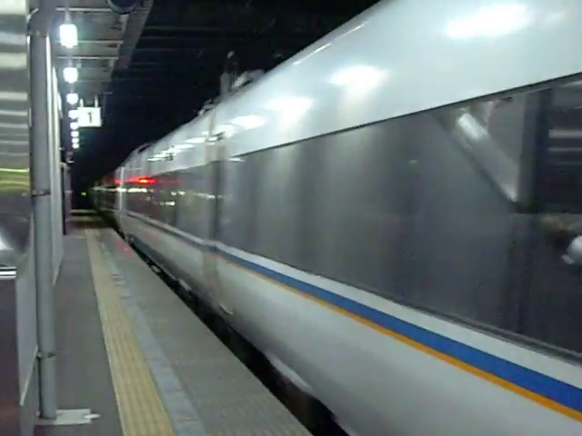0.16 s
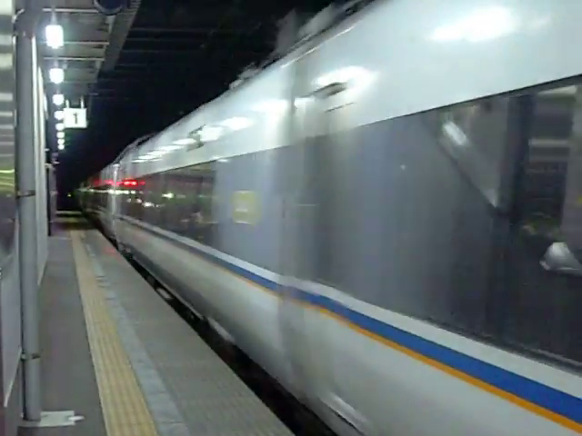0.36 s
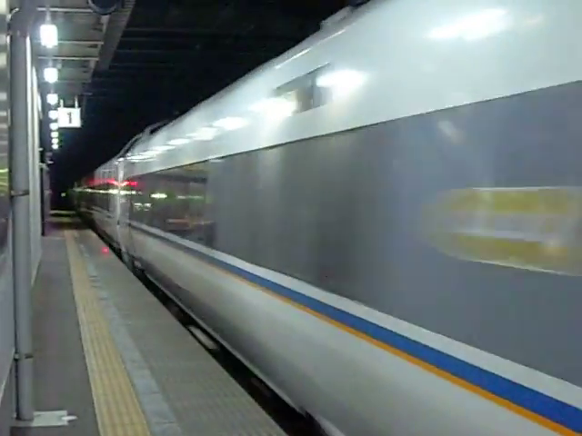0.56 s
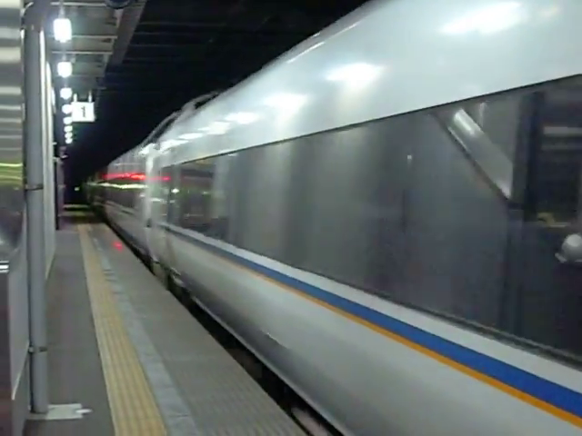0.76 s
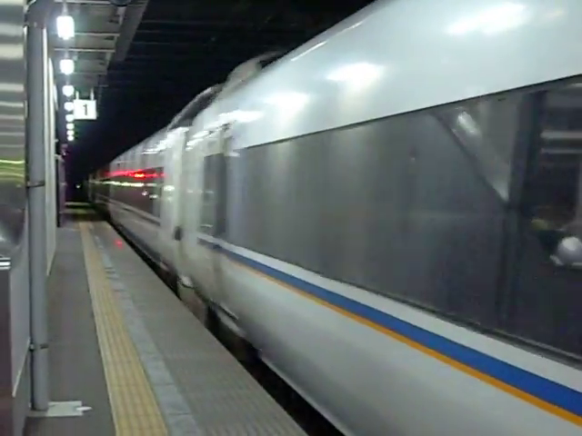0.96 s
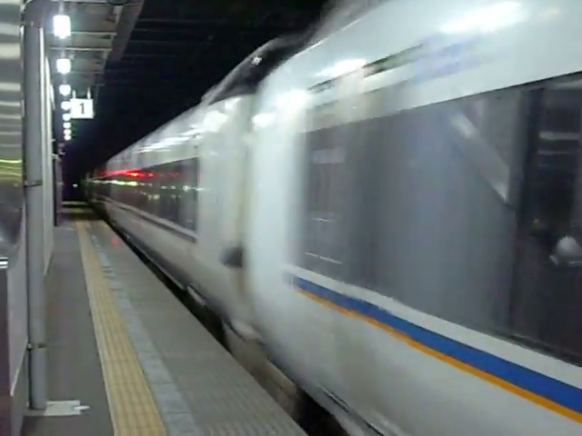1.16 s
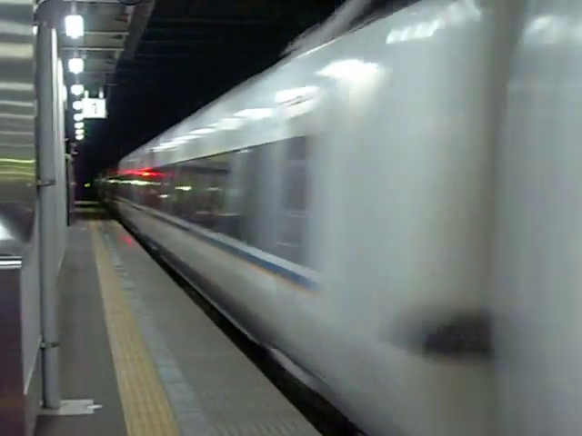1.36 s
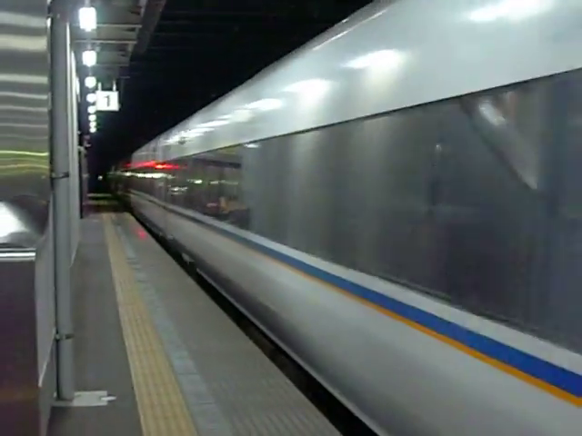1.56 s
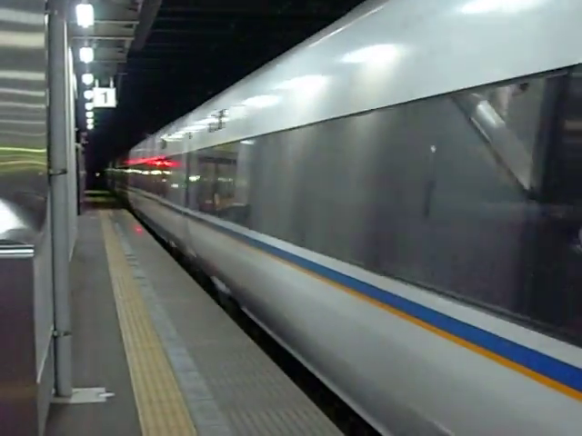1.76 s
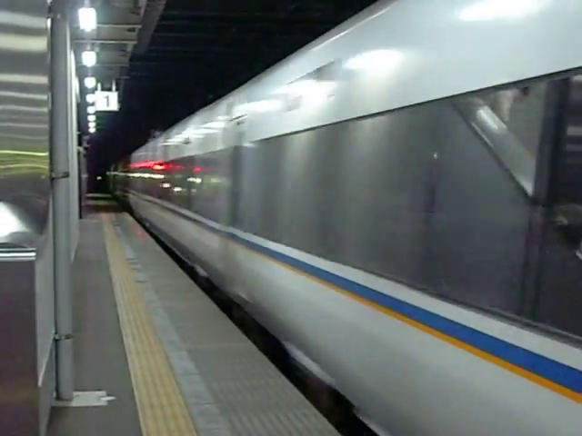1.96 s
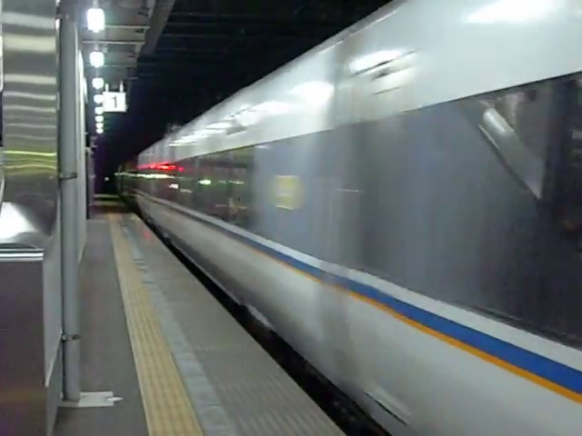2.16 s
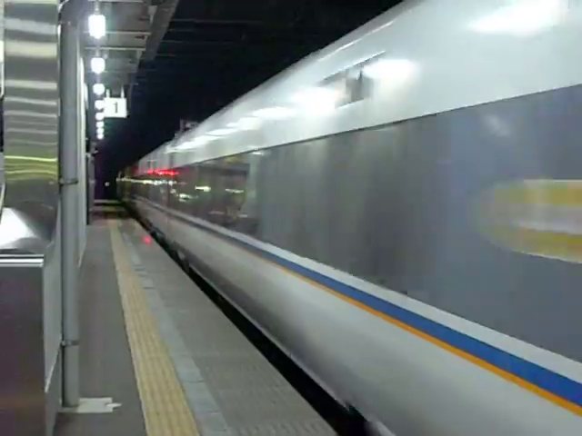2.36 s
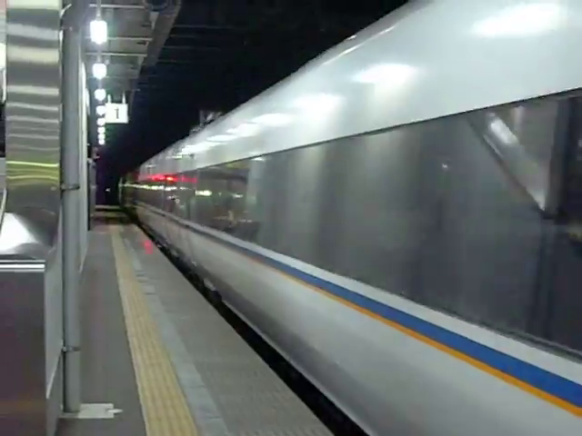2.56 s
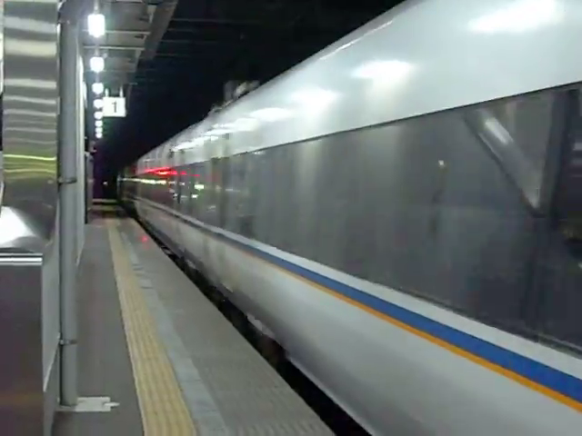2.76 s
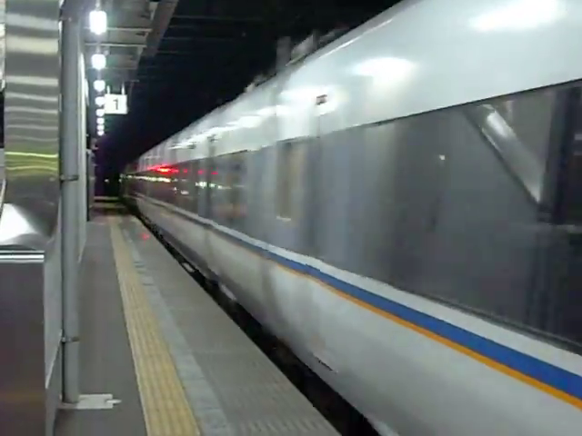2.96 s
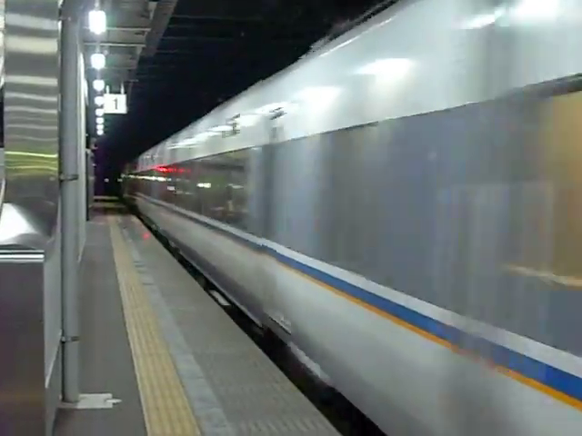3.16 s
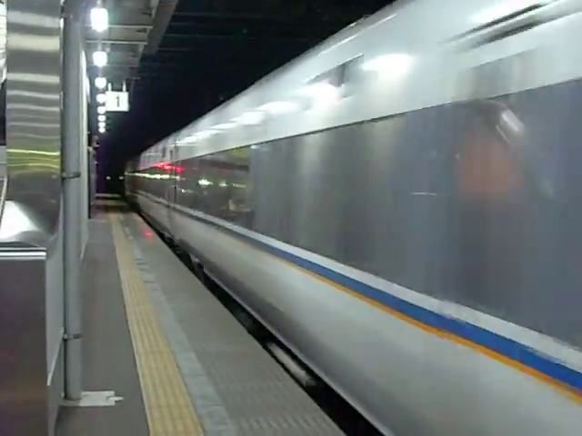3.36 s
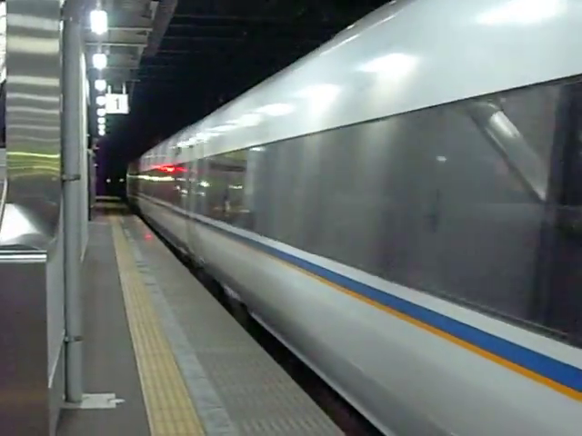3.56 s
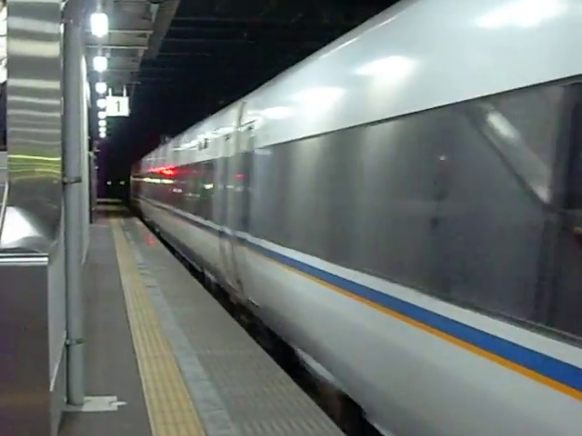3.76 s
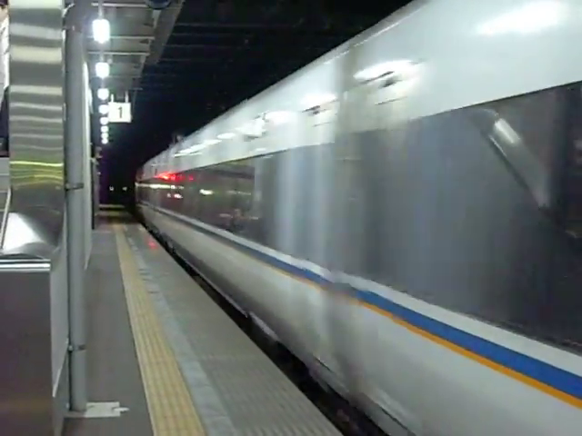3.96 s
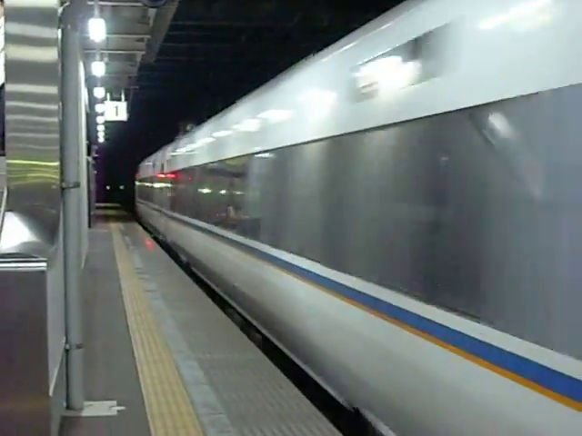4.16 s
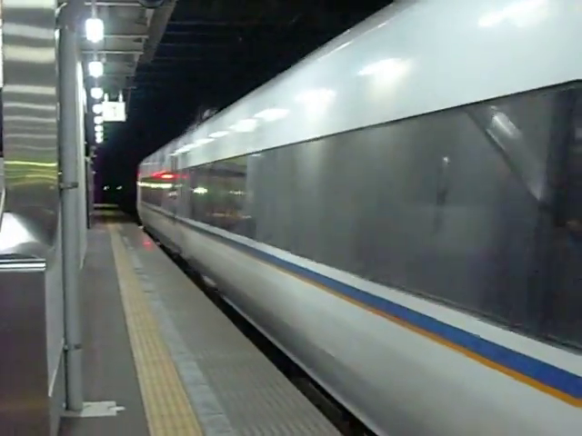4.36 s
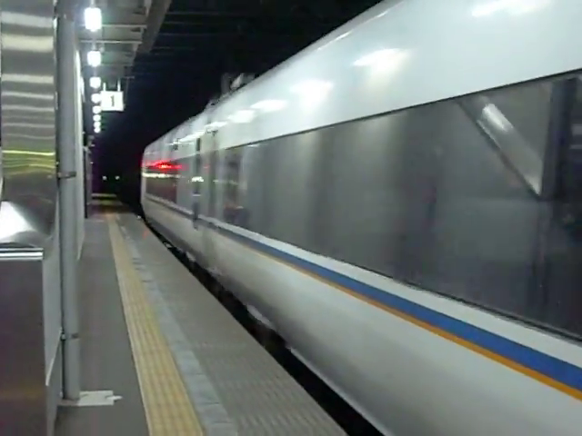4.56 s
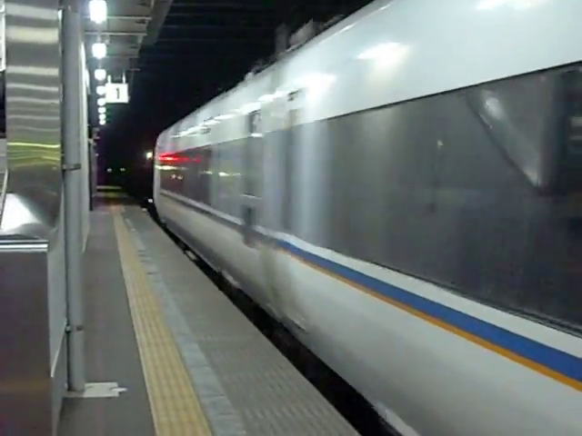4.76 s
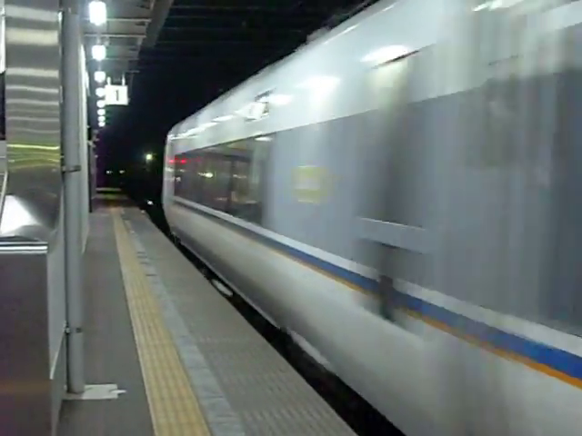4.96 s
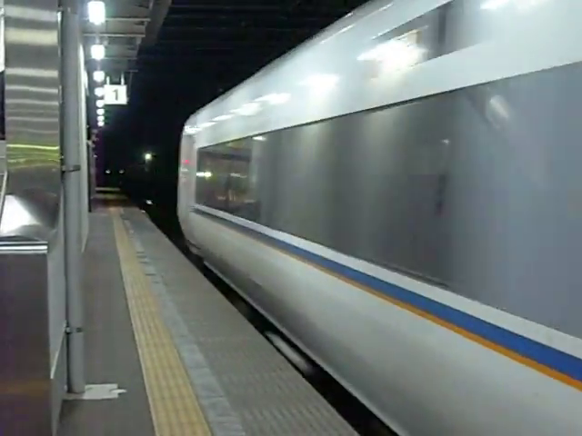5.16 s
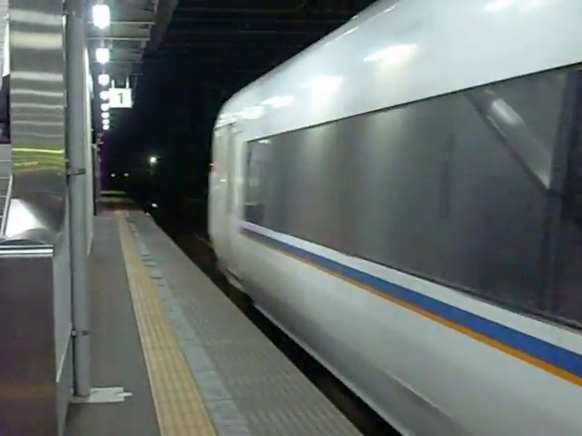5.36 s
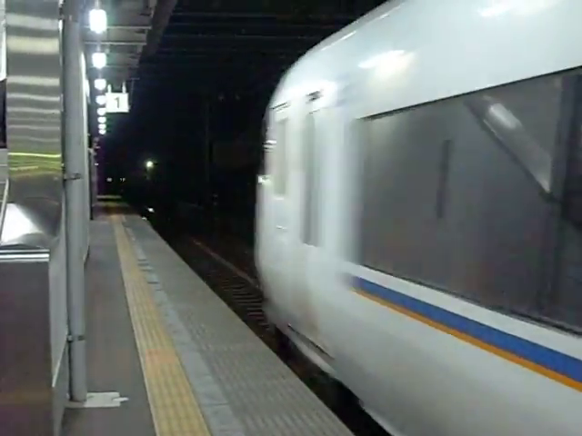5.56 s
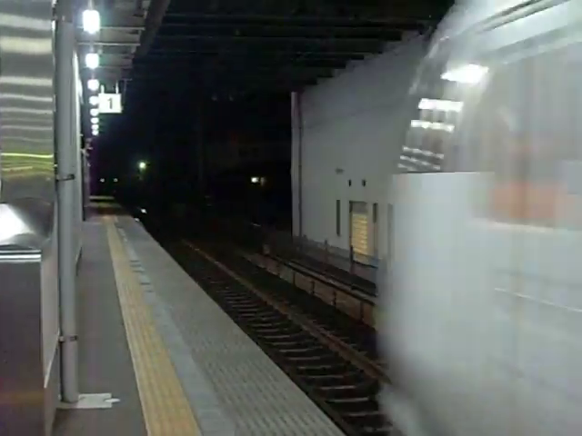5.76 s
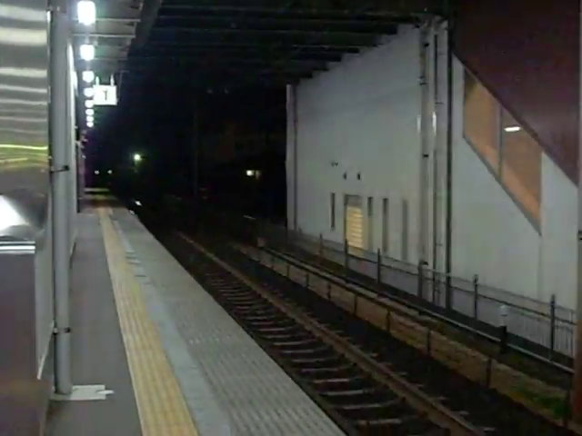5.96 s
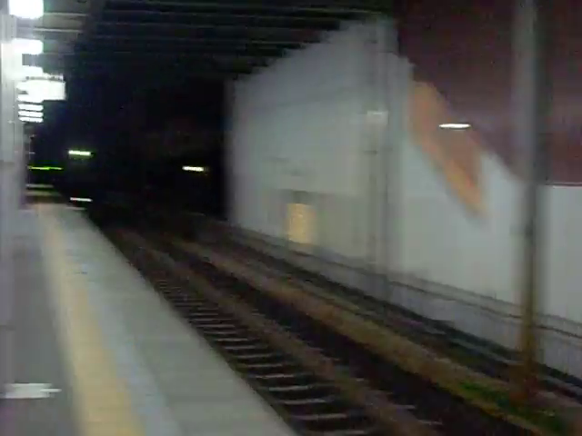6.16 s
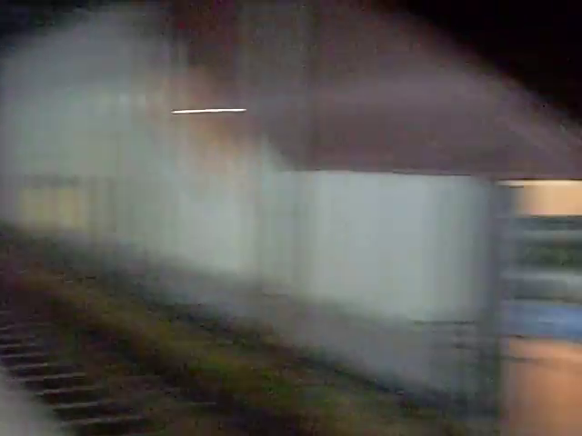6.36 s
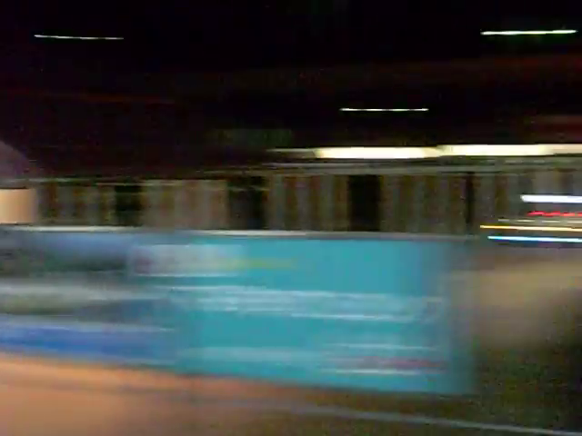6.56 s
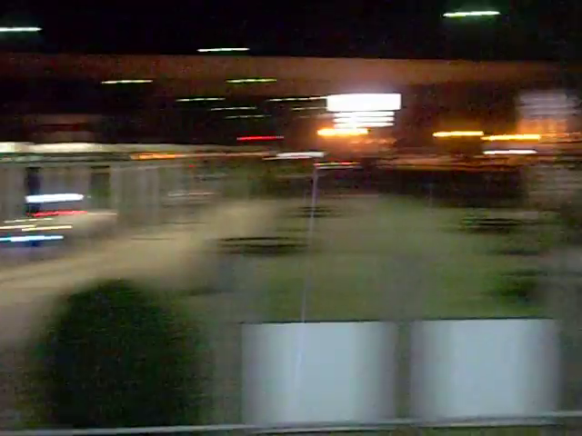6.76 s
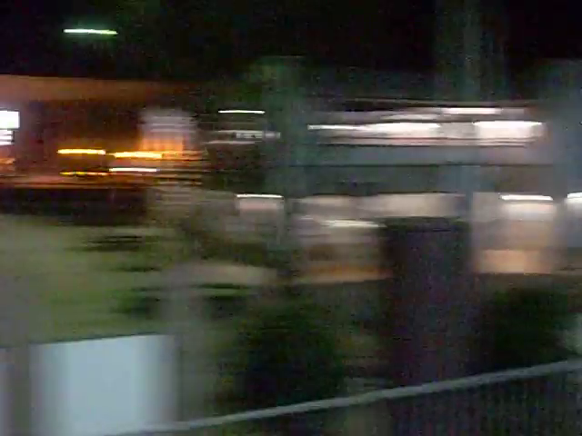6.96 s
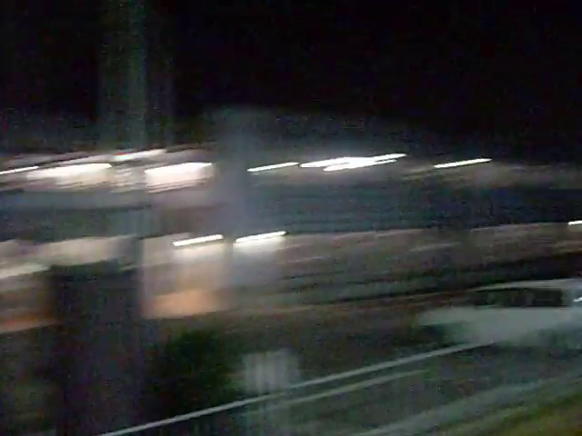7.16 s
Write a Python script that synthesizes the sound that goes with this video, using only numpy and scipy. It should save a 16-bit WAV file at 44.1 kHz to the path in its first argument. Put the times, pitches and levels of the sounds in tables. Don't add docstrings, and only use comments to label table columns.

```python
import sys
import numpy as np
from scipy import signal
from scipy.fft import rfft, irfft, next_fast_len
from scipy.io import wavfile
from scipy.ndimage import uniform_filter1d, map_coordinates

SR = 44100
rng = np.random.default_rng(int(sys.argv[2]) if len(sys.argv) > 2 else 0)


def makeup_ratio(level_db):
    decades = np.asarray(level_db, float) / 20
    return 10 ** decades


def bounce(signal):
    frames = np.transpose(np.atleast_2d(signal))
    limited = np.clip(frames, -1, 1)
    pcm = np.round(limited * 32767).astype(np.int16)
    wavfile.write(sys.argv[1], SR, pcm)


N = 321930


def unit(x):
    return x / np.sqrt(np.mean(x ** 2) + 1e-20)


def along(points, hz):
    point_hz, value = np.transpose(points)
    return np.interp(np.log(hz + 1), np.log(point_hz + 1), value)


def wobble(rate):
    return map_coordinates(rng.standard_normal(N // 100), [np.arange(N) * rate / SR])


def filtered(x, response):
    size = next_fast_len(len(x) + 8192)
    hz = np.fft.rfftfreq(size, 1 / SR)
    return irfft(rfft(x, size) * response(hz), size)[:len(x)]


def resonances(modes, hz):
    power = 0
    for centre, width, db in modes:
        damping = (hz * width) ** 2
        power = power + makeup_ratio(2 * db) * damping / ((centre * centre - hz * hz) ** 2 + damping)
    return np.sqrt(power)


def rush(response, patchy_db):
    z = signal.stft(rng.standard_normal(N), nperseg=512)[2]
    patches = uniform_filter1d(rng.standard_normal(z.shape), size=4, axis=0)
    patches = uniform_filter1d(patches, size=12, axis=1)
    noise = signal.istft(z * makeup_ratio(patchy_db * unit(patches)), nperseg=512)[1][:N]
    return unit(filtered(noise, response))


# pitch_hz, level_db [dB per Hz]
BUFFET = [(5, -10.5), (16, 2.5), (60, -4.5), (130, -4.5), (300, -11), (700, -33.5), (2000, -67.5)]
# centre_s, level_db, half_length_ms
GUSTS = [(.05, -28, 43), (.22, -33.5, 60), (.51, -27.5, 37), (.65, -25.5, 74), (1.05, -31, 64),
         (1.23, -36, 30), (1.39, -35, 53), (1.82, -33.5, 70), (2.13, -33, 75), (2.3, -29.5, 57),
         (2.66, -34.5, 51), (2.88, -30, 64), (3.05, -27, 18), (3.3, -27.5, 120), (3.6, -31, 230),
         (3.94, -29, 83), (4.17, -31, 50), (4.35, -30.5, 64), (4.55, -32.5, 40), (4.75, -32.5, 70),
         (4.95, -23.5, 84), (5.15, -28.5, 140), (5.61, -32, 41), (5.75, -39, 30), (6.17, -27.5, 74),
         (6.42, -26.5, 100), (6.61, -27.5, 134), (7.08, -35, 37), (7.29, -23.5, 30)]


def slipstream():
    t = np.arange(N) / SR
    power = makeup_ratio(2 * -42)
    for centre_s, db, half_ms in GUSTS:
        power = power + makeup_ratio(2 * db) * np.exp(-(1000 * (t - centre_s) / half_ms) ** 2)
    lumps = makeup_ratio(2.7 * wobble(25))
    rumble = rush(lambda hz: makeup_ratio(along(BUFFET, hz)), patchy_db=2.0)
    return np.sqrt(power) * unit(lumps * rumble)


def eddy(t, level_db, length_ms, centre_hz):
    f = np.fft.rfftfreq(len(t), 1 / SR)
    white = rfft(rng.standard_normal((3, len(t))))
    break_up_hz, break_up_db = 90, 3
    lumps = unit(irfft(white[2] / (1 + (f / break_up_hz) ** 4)))
    shape = np.exp(-(t / (length_ms * 0.00053)) ** 2)
    shape = shape * makeup_ratio(break_up_db * np.tanh(length_ms / 25) * lumps)
    swirl = unit(irfft(white[0] * (f / centre_hz) ** 0.81 / (1 + (f / (1.416 * centre_hz)) ** 4.2)))
    swirl = swirl / (np.abs(signal.hilbert(swirl)) + 0.13) ** 0.51
    burst = shape * (swirl - 0.13 * (swirl ** 2 - np.mean(swirl ** 2)))
    push = shape ** .25 * irfft(white[1] * f / (1 + (f / 160) ** 3))
    size = np.sqrt(np.sum(shape ** 2))
    return makeup_ratio(level_db) * size * (burst / np.linalg.norm(burst) + 0.23 * push / np.linalg.norm(push))


# centre_s, peak_db
POPS = [(.642, -5), (.6445, -3.1), (5.028, -3.55), (6.169, -4.5), (6.6197, -1.5), (6.4525, -1.5),
        (6.46, -2), (6.484, -2), (6.486, -2), (6.491, -3), (6.494, -2), (6.5225, -2), (6.525, -1.5),
        (6.529, -2), (6.5315, -1.5), (4.93, -7), (6.176, -8), (6.194, -8), (6.262, -6), (7.291, -7),
        (4.216, -8), (4.36, -11), (3.361, -11), (.044, -11), (5.169, -9), (7.076, -12), (7.088, -10)]


def add_pops(pressure, t):
    for centre_s, db in POPS:
        width_ms = .34 - .025 * db
        u = (1000 * t / width_ms) ** 2
        spot = pressure[round(centre_s * SR):][:len(t)]
        spot *= 1 - np.exp(-u / 3)
        spot -= makeup_ratio(db) * (1 - 1.2 * u) * np.exp(-u)


# centre_s, level_db, length_ms, pitch_hz
EDDIES = [(0.044, -22, 5, 440), (0.512, -21.5, 9, 590), (0.628, -18.5, 7.2, 630), (0.643, -26, 4.4, 560),
          (1.051, -24.5, 7.3, 310), (2.399, -18.5, 6.4, 760), (3.051, -24, 16, 100), (3.2, -24, 56, 400),
          (3.259, -18.5, 12, 650), (3.361, -17.5, 20, 547), (3.404, -17.5, 14, 700),
          (3.531, -19.5, 13, 300), (3.695, -18, 26, 380), (3.93, -27.5, 40, 250), (4.216, -15.5, 20, 380),
          (4.354, -21.5, 22, 530), (4.514, -25.5, 7, 494), (4.714, -23, 31, 590), (4.81, -28, 49, 400),
          (4.901, -21.5, 21, 450), (4.931, -16, 7, 617), (4.992, -17, 7.3, 666), (5.028, -17, 12, 756),
          (5.041, -17, 7.2, 330), (5.061, -23, 8.1, 413), (5.169, -20, 6, 580), (5.19, -24, 20, 600)]
# centre_s, level_db, length_ms, pitch_hz
WAKE = [(6.135, -29.5, 76, 350), (6.154, -15, 9.2, 335), (6.169, -2, 4.4, 600), (6.177, -10, 4.4, 800),
        (6.192, -14.5, 8.5, 750), (6.218, -16, 11, 400), (6.263, -6.5, 6, 650), (6.278, -18, 14, 543),
        (6.294, -20.5, 13, 560), (6.335, -23, 32, 109), (6.352, -21.5, 25, 480), (6.41, -20, 29, 520),
        (6.441, -15.5, 12, 700), (6.453, -8, 8.7, 950), (6.485, -16.5, 60, 900), (6.487, -4, 6, 1490),
        (6.496, -10.5, 13, 1150), (6.525, -5, 5, 900), (6.529, -1, 7.6, 950), (6.545, -17.5, 34, 28),
        (6.55, -18, 22, 450), (6.585, -21.5, 50, 380), (6.611, -15, 9, 520), (6.619, -6.5, 3, 573),
        (6.658, -12, 9.5, 560), (6.683, -21, 30, 400), (7.079, -17, 9, 656), (7.095, -26, 91, 420),
        (7.277, -15, 8.9, 690), (7.294, -18.5, 10, 380)]


def eddies():
    half = 4096
    pressure = np.zeros(N + 4 * half)
    t = (np.arange(2 * half) - half) / SR
    for centre_s, db, ms, hz in list(EDDIES) + list(WAKE):
        pressure[round(centre_s * SR):][:len(t)] += eddy(t, db, ms, hz)
    pressure = .65 * np.tanh(pressure / .65)
    add_pops(pressure, t)
    return pressure[half:][:N]


# level_s, rail_db, ring_db, whine_db, air_db
BOGIES = [(-.11, -26.5, -40, -40, -31), (.35, -27, -35.5, -39, -30.5), (.7, -27, -30, -31, -26.5),
          (1.37, -28.5, -33.5, -35, -31.5), (1.58, -25.5, -37, -44, -29.5), (2.25, -25.5, -41.5, -48, -29),
          (2.54, -30, -32.5, -33, -28), (3.09, -26, -30, -34, -27), (3.4, -27, -31.5, -32.5, -27),
          (4.0, -27, -39.5, -37, -31), (4.24, -25, -34.5, -38, -29.5), (4.9, -26.5, -44, -48, -31),
          (5.19, -28.5, -32, -35, -27), (5.84, -29, -35.5, -35.5, -30.5)]


def passing(column, lag_s, approach_s, retreat_s, far_db):
    rows, t = np.array(BOGIES), np.arange(0, N + 64, 64) / SR
    shadow = 3.35
    since = t - rows[:, :1] - lag_s
    away = since / np.where(since < 0, approach_s, retreat_s)
    falloff = (1 + np.abs(away) ** np.where(since < 0, 2, shadow)) ** 1.5
    power = makeup_ratio(2 * rows[:, column:column + 1]) / falloff
    far = makeup_ratio(2 * (far_db - 3 * np.maximum(since[-1], 0)))
    total = power.sum(axis=0) + far
    motion = (power * away / np.hypot(1, away)).sum(axis=0) / total
    return [np.interp(np.arange(N) / SR, t, curve) for curve in (10 * np.log10(total), motion)]


def wheel_whine():
    level_db, motion = passing(3, lag_s=-0.2, approach_s=0.2, retreat_s=0.34, far_db=-46)
    whine_hz, slide = 1486.5, .025
    phase = 2 * np.pi * np.cumsum(whine_hz * (1 - slide * motion)) / SR
    slow = [filtered(rng.standard_normal(N), lambda f: 1 / (1 + (f / 120) ** 3)) for _ in range(2)]
    whine = unit(slow[0] * np.cos(phase) + slow[1] * np.sin(phase))
    fading = np.clip((6.6 - np.arange(N) / SR) / 0.66, 0, 1)
    return makeup_ratio(level_db - 2.3 + 1.0 * wobble(9.9)) * fading * whine


# pitch_hz, level_db [dB per Hz]
AIR = [(500, -37.5), (1500, -4.5), (2500, -4), (3400, -3), (4400, -3), (6000, -4.5)]
# pitch_hz, width_hz, level_db
SKIRT = [(2882, 570, 1), (3880, 380, -4), (4860, 500, -6)]


def air_hiss(flutter_db):
    level_db = passing(4, lag_s=0.02, approach_s=0.25, retreat_s=.19, far_db=-35.5)[0]

    def colour(hz):
        return np.hypot(makeup_ratio(along(AIR, hz)), makeup_ratio(2.0) * resonances(SKIRT, hz) ** 1.31)

    hiss = rush(colour, patchy_db=0.5)
    near_hz, near_brighter = 3600, .12
    top = filtered(hiss, lambda hz: 1 / (1 + (near_hz / (hz + 1)) ** 6))
    hiss = hiss + top * (makeup_ratio(near_brighter * (level_db - np.median(level_db))) - 1)
    return makeup_ratio(level_db + 4.0 + 0.62 * flutter_db) * hiss


# pitch_hz, width_hz, level_db
WHEEL = [(2046, 240, -2.5), (1200, 170, -10)]


def wheel_ring(flutter_db):
    level_db = passing(2, lag_s=0.07, approach_s=0.23, retreat_s=0.23, far_db=-43)[0]
    ring = rush(lambda hz: resonances(WHEEL, hz) ** 1.42, patchy_db=2.1)
    return makeup_ratio(level_db - 0.34 + flutter_db) * ring


# pitch_hz, level_db [dB per Hz]
ROAR = [(60, -42), (150, -12.5), (300, -3.5), (600, -4), (1200, -7.5), (2000, -17), (4000, -48.5)]
# pitch_hz, width_hz, level_db
RAIL = [(355, 41, -3), (745, 330, -0.5), (1050, 300, -6)]


def rail_roar(flutter_db):
    level_db = passing(1, lag_s=0.02, approach_s=0.1764, retreat_s=0.3173, far_db=-33.5)[0]

    def colour(hz):
        return np.hypot(makeup_ratio(along(ROAR, hz)), makeup_ratio(-1.0) * resonances(RAIL, hz) ** 2)

    return makeup_ratio(level_db + 0.5 + flutter_db) * rush(colour, patchy_db=1.0)


def train():
    flutter_db = 0.41 * wobble(20)
    return rail_roar(flutter_db) + wheel_ring(flutter_db) + air_hiss(flutter_db)


def scene():
    return (slipstream() + eddies() + wheel_whine() + train())[None]


def roll_off(x):
    return signal.sosfilt(signal.butter(12, 15760, fs=SR, output="sos"), x)


# pitch_hz, level_db
BAND = [(4800, 0.5), (5200, -2), (5600, -11.5), (5900, -18), (6100, -23.5), (6250, -67), (6400, -120)]


def record(dry):
    ceiling = .7
    narrow = filtered(dry[0], lambda hz: makeup_ratio(along(BAND, hz))) - .0028
    return roll_off(np.clip(narrow, -ceiling, ceiling)[None])


dry = scene()
out = record(dry)
bounce(out)
```